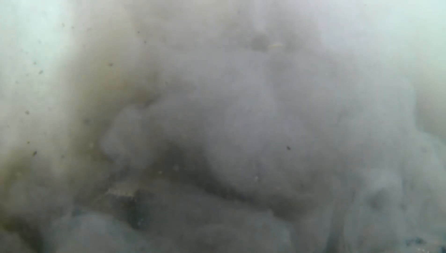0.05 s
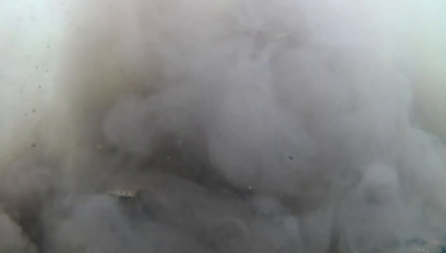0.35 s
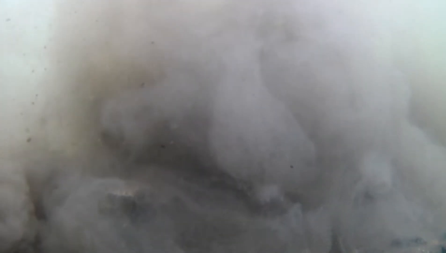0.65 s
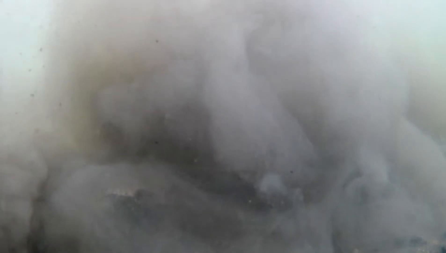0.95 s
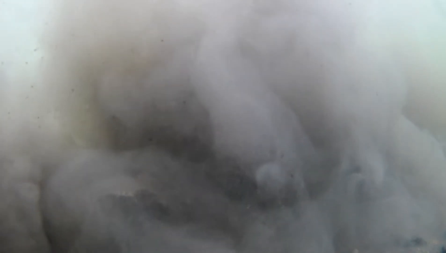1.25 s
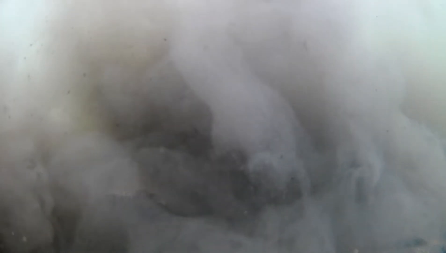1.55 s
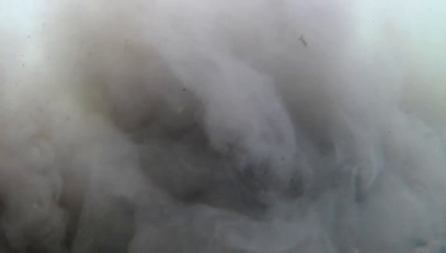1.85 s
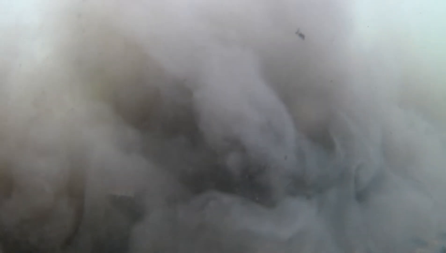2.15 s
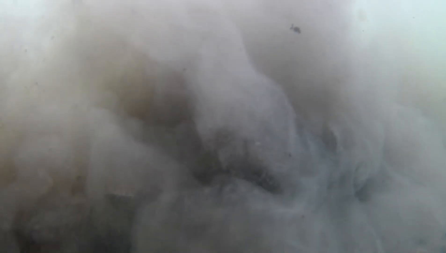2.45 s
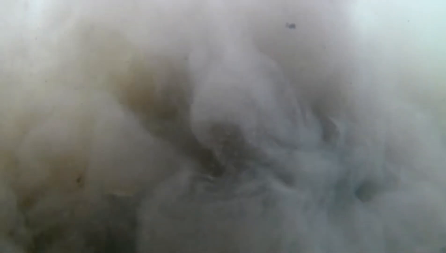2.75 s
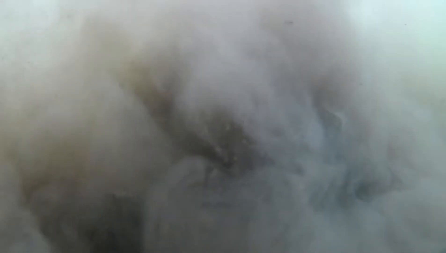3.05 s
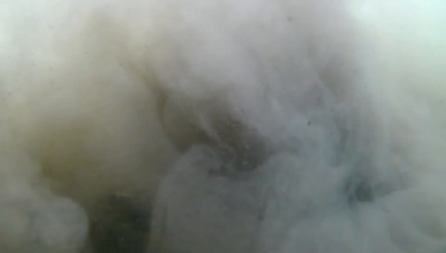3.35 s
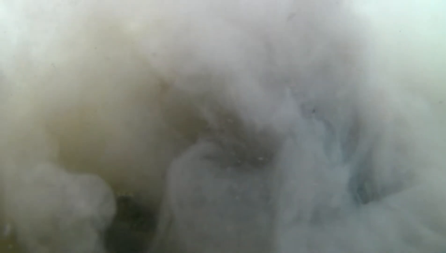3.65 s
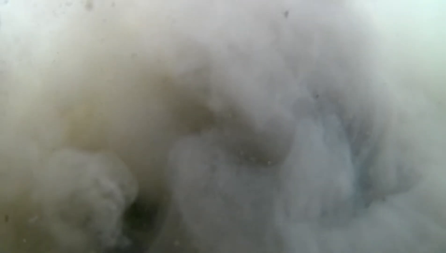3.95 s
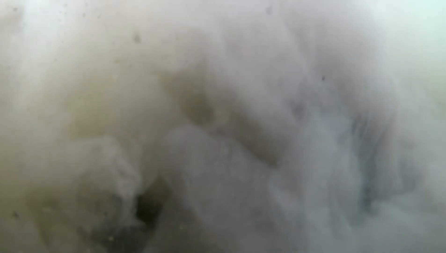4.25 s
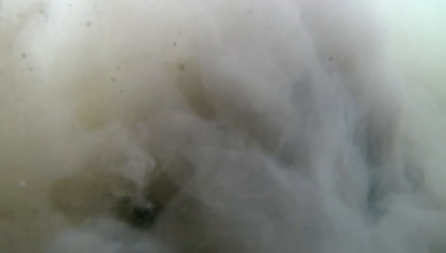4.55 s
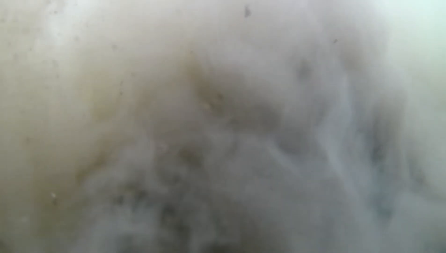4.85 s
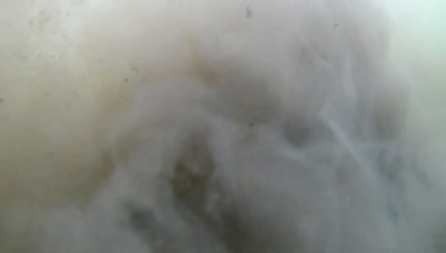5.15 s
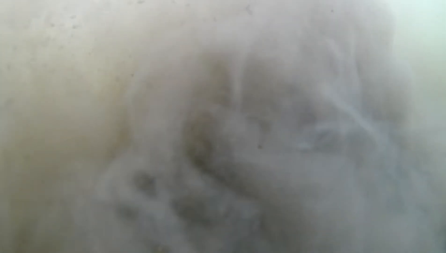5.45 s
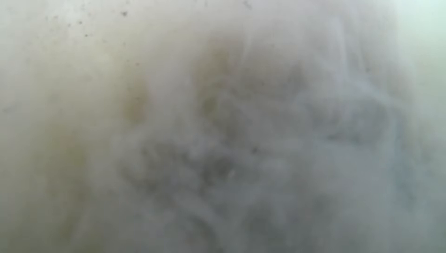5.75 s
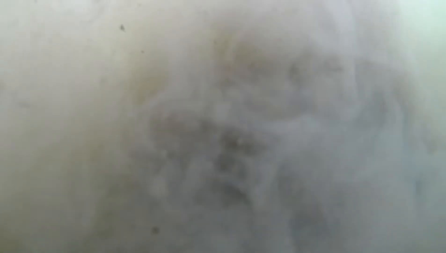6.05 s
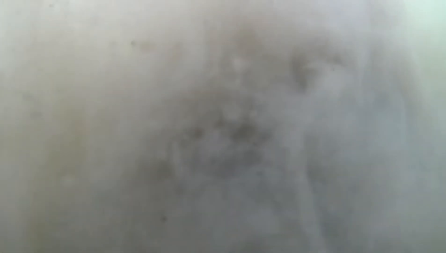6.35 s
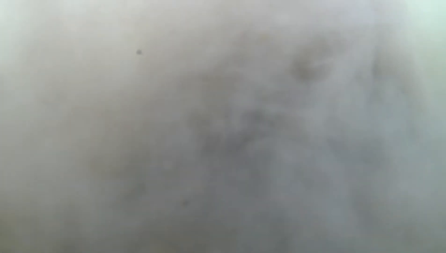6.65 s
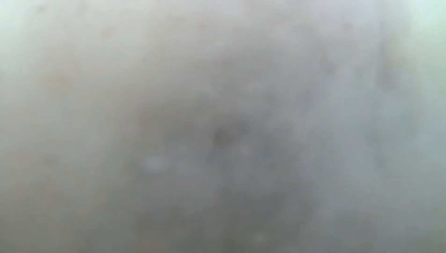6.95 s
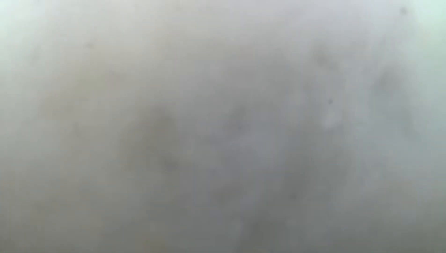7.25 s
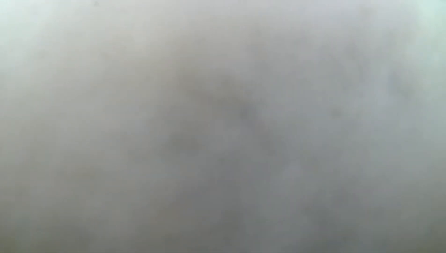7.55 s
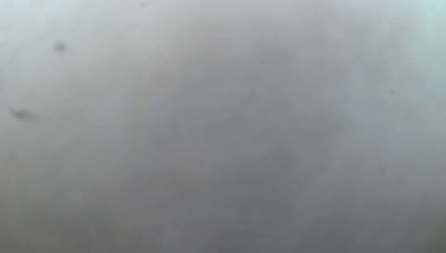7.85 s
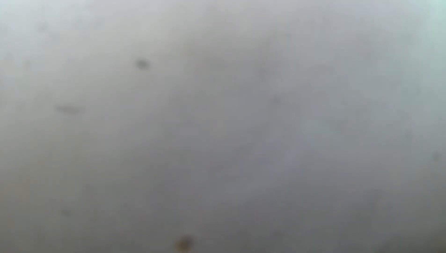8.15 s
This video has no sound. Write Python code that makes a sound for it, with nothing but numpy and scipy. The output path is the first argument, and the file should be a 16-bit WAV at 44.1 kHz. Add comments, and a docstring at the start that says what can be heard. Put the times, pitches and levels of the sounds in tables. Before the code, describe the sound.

A duck feeds on a muddy lake bed, heard muffled through an underwater microphone in a watertight case. From the start, its bill dabbles in quick, dull nibbles and harder hollow pecks, with gritty clicks over a low rumble of churned water; the hardest peck lands at about 0.3 seconds. After 2 seconds it slows to single pecks, stopping by 3 seconds.

Sand then hisses softly and bubbles swell into a dense gurgle, strongest from 3.2 to 4 seconds before easing. A second, lighter surge of sand and bubbles comes at around 5.5 seconds, with the loudest single plop at 6 seconds. The bubbling thins to scattered, quieter plops, the last near 7.6 seconds.

Knocks and bubbles make the case ring briefly. A faint low hum and hiss continue to the end at about 8 seconds, while very soft high ticks come and go.

```python
"""Ducks feed on a muddy lake bed, heard from a camera in a watertight case under the surface.
First a bill dabbles in the silt: quick dull nibbles, harder pecks and clicks on grit over a rumble of
churned water. It slows to single pecks and stops. Then the bed is stirred twice: sand hisses up,
bubbles gurgle after it and thin out to single plops. Knocks, bubbles and grains ring the case;
a faint hum and hiss lie under it all, and soft high ticks come and go."""
import sys
import numpy as np
from scipy import signal
from scipy.fft import rfft, irfft, next_fast_len
from scipy.io import wavfile

SR = 44100
rng = np.random.default_rng(int(sys.argv[2]) if len(sys.argv) > 2 else 0)


def dump_mix(stems):
    """Bounce the given channels to the path in sys.argv[1] as a 16-bit WAV at rate SR."""
    frames = np.atleast_2d(stems).T  # one column per channel
    limited = np.clip(frames, -1, 1)  # hard clip at full scale
    pcm = np.round(limited * 32767).astype(np.int16)
    wavfile.write(sys.argv[1], SR, pcm)


N = 361604
T = np.arange(N) / SR

# Hard pecks of the bill. Each row: time in seconds, level in dB, pitch in Hz.
HARD_PECKS = [(.188, -26, 647), (0.2611, -25.5, 566), (.2955, -27, 655), (0.2986, -13, 633),
              (.343, -30, 545), (.385, -30.5, 600), (0.4261, -28, 532), (0.478, -25, 693),
              (0.5209, -26, 500), (.567, -34, 600), (0.6244, -26, 538), (0.6554, -26, 547),
              (0.7192, -24, 572), (0.7333, -24, 644), (.738, -35, 570), (.769, -30.5, 600),
              (0.7927, -24, 528), (.7995, -29, 564), (.848, -31, 555), (.885, -29.5, 620),
              (0.939, -29.5, 530), (1.116, -16.5, 466), (1.1552, -23, 550), (1.192, -30.5, 534),
              (1.231, -24, 676), (1.254, -28.5, 614), (1.2881, -23.5, 515), (1.308, -26, 590),
              (1.377, -26.5, 432), (1.3965, -28, 527), (1.436, -28, 614), (1.483, -42, 600),
              (1.578, -28, 580), (1.6742, -30.5, 704), (1.729, -32.5, 586), (1.776, -31, 565),
              (1.8616, -18, 635), (1.894, -37.5, 715), (1.959, -30.5, 644), (2.001, -21, 580),
              (2.054, -30.5, 710), (2.109, -26.5, 534), (2.171, -40.5, 696), (2.195, -43, 530),
              (2.226, -47, 660), (2.279, -46, 749), (2.305, -39, 470), (2.321, -29.5, 558),
              (2.349, -43, 430), (2.3645, -27.5, 438), (2.506, -37, 593), (2.5687, -28, 570),
              (2.629, -39.5, 600), (2.705, -36, 624), (2.86, -34.5, 633), (2.954, -45.5, 705)]
# Mud churned by the bill. Each row: time in seconds, patter level in dB, rumble level in dB.
MUD_CHURN = [(0, -54.5, -55), (.2, -42, -53), (.7, -43.5, -48.5), (1.05, -47, -52), (1.35, -42.5, -50),
             (1.8, -47.5, -57), (2.25, -55.5, -63), (2.5, -54, -63), (3.05, -66.5, -85)]
# Stirrings of the bed. Each row: time of full strength in seconds, hold in seconds, build-up in dB/s,
# settling in dB/s, levels of coarse sand, fine sand and bubbles in dB.
BED_STIRS = [(3.306, 0.22, 23, 21.5, -59.5, -66, -41), (5.44, 0.17, 49.5, 36.5, -61.5, -64.5, -46.5)]
# Low and high modes of the case. Each row: frequency in Hz, gain in dB, T60 in seconds.
CASE_LOW_MODES = [(350, -19.5, 0.45), (446, -4, 0.54), (569.6, 8.5, 0.21), (564, -7.5, 0.34),
                  (721.5, 0.5, 0.23), (779, -8.5, 0.052), (806, -10, 0.24)]
CASE_HIGH_MODES = [(1322, 19.5, 0.12), (1994, 19, 0.065), (2630, -1.5, 0.022), (3480, -2.5, 0.039),
                   (4130, -9.5, 0.0097), (6200, -6.5, 0.0046)]
# Spectrum of scraped grit. Each row: frequency in Hz, gain in dB.
GRIT_SPECTRUM = [(500, -7.5), (1000, 17), (1250, 5), (1650, 13.5), (2150, -5.5), (2500, 4), (2850, -21),
                 (3300, -10.5), (4300, -14), (5500, -32.5), (6500, -13.5), (8000, -39)]


def undb(db):
    """Decibels to gain."""
    return 10 ** (np.asarray(db) / 20)


def unit(x):
    """Scale to rms 1."""
    return x / np.sqrt(np.mean(x ** 2) + 1e-20)


def curve(table, column=1):
    """Gain over time from a dB column; fades outside the table's span."""
    rows = np.asarray(table)
    outside_s = np.maximum(rows[0, 0] - T, 0) + np.maximum(T - rows[-1, 0], 0)
    return undb(np.interp(T, rows[:, 0], rows[:, column])) * np.exp(-outside_s / 0.071)


def surge(s, hold_s, build_db_per_s, settle_db_per_s):
    """Gain that builds to 1 at time s, holds and settles."""
    return undb(-build_db_per_s * np.maximum(s - T, 0) - settle_db_per_s * np.maximum(T - s - hold_s, 0))


def walk(knots_per_s):
    """Random drift with a spread near 1."""
    knots = rng.standard_normal(1024)
    return np.interp(T * knots_per_s, np.arange(len(knots)), knots) * np.sqrt(3 / 2)


def colour(x, spectrum):
    """Filter by (Hz, dB) points, to rms 1."""
    hz, db = np.transpose(spectrum)
    size = next_fast_len(N, True)
    bins_hz = np.maximum(np.arange(size // 2 + 1) * SR / size, 1)
    gain = undb(np.interp(np.log(bins_hz), np.log(hz), db))
    return unit(irfft(rfft(x, size) * gain, size)[:N])


def muffle(x, hz):
    """Steep low-pass."""
    return signal.sosfilt(signal.butter(8, hz, fs=SR, output="sos"), x)


def zero_phase(x, order, hz, kind="low"):
    """Butterworth filter, run forward and back."""
    return signal.sosfiltfilt(signal.butter(order, hz, kind, fs=SR, output="sos"), x)


def add(track, s, sound):
    """Mix a sound into a track at time s."""
    i = int(np.clip(s * SR, 0, N))
    track[i:i + len(sound)] += sound[:N - i]


def swell(rise_s, shape):
    """Envelope peaking at rise_s; a higher shape starts softer and dies sooner."""
    t = T[:int(8 * rise_s * SR)]
    return (t / rise_s * np.exp(1 - t / rise_s)) ** shape


def ping(hz, rise_s, shape, glide_per_s=0):
    """Resonance that swells and dies; the glide is a share of its pitch."""
    envelope = swell(rise_s, shape)
    t = T[:len(envelope)]
    return envelope * np.sin(2 * np.pi * hz * t * (1 + glide_per_s * t / 2))


def swarm(hz, spread, rise_s, scatter_db, count, shape=1):
    """Pings of random time, pitch, length and size over the whole scene, rms 1."""
    out = np.zeros(N)
    starts_s = rng.uniform(0, N / SR, count)
    for s, (pitch, length, size) in zip(starts_s, np.clip(rng.standard_normal((count, 3)), -2, 2)):
        tone = ping(hz * np.exp(spread * pitch), rise_s * np.exp(0.45 * length), shape)
        add(out, s, undb(scatter_db * size) * tone)
    return unit(out)


def case_ring(push, modes, lag_s=0):
    """The case rings on in its damped modes after a push."""
    t = T[:SR // 2]
    response = sum(undb(db - 60 * t / t60_s) * np.cos(2 * np.pi * hz * t) / t60_s
                   for hz, db, t60_s in modes)
    out = np.zeros(N)
    add(out, lag_s, signal.fftconvolve(push, response * 2 * np.log(1000) / SR)[:N])
    return out


def camera(hiss_db=-64, hum_hz=33.5):
    """Steady hiss and a low wavering hum."""
    # Noise floor. Each row: frequency in Hz, gain in dB.
    hiss_spectrum = [(12, -14.5), (35, 9), (80, -3), (160, -0.5), (300, -7.5), (500, -8), (730, -2),
                     (950, -16), (1400, -18), (2500, -24), (4000, -26), (7600, -31), (9000, -49)]
    # Odd harmonics of the hum. Each row: multiple of hum_hz, rms level in dB.
    harmonics = [(1, -68), (3, -71.5), (5, -81.5), (7, -88.5), (9, -87.5)]
    phase = 2 * np.pi * np.cumsum(hum_hz * (1 + .008 * walk(7.9))) / SR
    hum = sum(undb(db + 1.3 * walk(15)) * np.sqrt(2) * np.sin(k * phase) for k, db in harmonics)
    return undb(hiss_db) * colour(rng.standard_normal(N), hiss_spectrum) + hum


def ticking(tick_db=-2, tick_hz=4920, count=150, chirp_gap_s=0.018):
    """Faint high ticks come and go, at times bunched into a chirp of three."""
    # Loudness of the ticks. Each row: time in seconds, level in dB.
    tick_levels = [(0, -72), (2.2, -73), (2.35, -90), (4.95, -90), (5.08, -70), (6.2, -72), (8.2, -73)]
    # Chirps. Each row: start in seconds, level in dB, pitch in Hz.
    chirp_events = [(.205, -73, 4840), (.625, -76.5, 4900), (5.83, -74.5, 4720), (6.78, -75, 4830)]
    ticks, chirps = np.zeros((2, N))
    for k, (late, pitch, size) in enumerate(rng.standard_normal((count, 3))):
        tick = ping(tick_hz * (1 + .025 * pitch), rise_s=.0038, shape=5)
        add(ticks, (k + 1.1 * late) * N / SR / count, undb(tick_db + 1.3 * size) * tick)
    for s, db, hz in chirp_events:
        for k, pitch in enumerate(rng.standard_normal(3)):
            tick = ping(hz * (1 + .015 * pitch), rise_s=.006, shape=4, glide_per_s=1)
            add(chirps, s + k * chirp_gap_s, undb(db) * tick)
    return curve(tick_levels) * ticks + chirps


def bubble_flow(lag_s=0.031, linger_s=0.038, seep_db=-73.5):
    """Gain of the gurgle: it lags each stirring; after the first the bed goes on seeping."""
    flow = sum(undb(db) * surge(s + lag_s, hold_s + linger_s, build_db_per_s=53.5, settle_db_per_s=33.5)
               for s, hold_s, *_, db in BED_STIRS)
    return flow + undb(seep_db) * (T > BED_STIRS[0][0])


def eddies(rumble_db=1, flutter_db=0.5, wake_db=-24):
    """Churned water presses on the case in a fluttering rumble; rising bubbles leave a softer wake."""
    # Spectra of rumble and wake. Each row: frequency in Hz, gain in dB.
    rumble_spectrum = [(15, -23), (30, 3), (70, -4), (125, -3.5), (200, -4), (320, -2.5), (600, -8),
                       (1200, -90.5)]
    wake_spectrum = [(70, -4.5), (125, 13.5), (175, -5.5), (260, -5), (500, -54)]
    pressure = undb(rumble_db + flutter_db * walk(22)) * curve(MUD_CHURN, column=2)
    rumble = colour(rng.standard_normal(N), rumble_spectrum)
    wake = colour(rng.standard_normal(N), wake_spectrum)
    return pressure * rumble + undb(wake_db) * bubble_flow() * wake


def sand(coarse_db=-5.5, fine_db=-5, hiss_db=-3, fizz_db=-1.5, drift_db=-84.5, fine_lead_s=.04):
    """Grains crackle on the case and ring its high modes amid a fizz; fine, bright sand arrives first."""
    # Spectrum of the crackle. Each row: frequency in Hz, gain in dB.
    spectrum = [(600, -12), (1000, 10), (1200, -10.5), (1500, -7.5), (1800, -1.5), (2250, -18.5),
                (2520, -4.5), (2950, -17), (3450, -8.5), (4100, -12), (4600, -14), (6200, -26), (8000, -50)]
    # Brief crackling hisses: puffs of sand, and the case's high ring after the loudest plop.
    # Each row: start in seconds, level in dB, rise in seconds.
    hisses = [(.18, -63, 0.017), (1.611, -62, 0.012), (1.696, -55, 0.0055), (2.425, -63, 0.0036),
              (2.467, -62.5, .004), (2.765, -70, 0.0097), (3.328, -53.5, 0.013), (4.629, -63, 0.0058),
              (4.679, -70, 0.0049), (4.968, -63, 0.0034), (5.255, -69, 0.0061), (6.008, -65, .012)]
    coarse_flow, fine_flow = np.zeros((2, N))
    for s, hold_s, build, settle, stir_coarse_db, stir_fine_db, _ in BED_STIRS:
        coarse_flow += undb(stir_coarse_db + coarse_db) * surge(s, hold_s, build, settle)
        fine_flow += undb(stir_fine_db + fine_db) * surge(s - fine_lead_s, hold_s, build, settle)
    coarse_flow += undb(drift_db + coarse_db) * (T < BED_STIRS[-1][0])  # drifts until the last stir
    for s, db, rise_s in hisses:
        add(coarse_flow, s, undb(db + hiss_db) * swell(rise_s, 0.93))
    sizes = undb(2.5 * np.minimum(rng.exponential(size=N), 4))
    impacts = rng.standard_normal(N) * (rng.random(N) < .025) * sizes
    grains = colour(impacts, spectrum)
    fizz = swarm(hz=2400, spread=.42, rise_s=.0019, scatter_db=2.8, count=4000, shape=2)
    crackle = unit(grains + case_ring(grains, CASE_HIGH_MODES)) + undb(fizz_db) * colour(fizz, spectrum)
    coarse = zero_phase(crackle, order=2, hz=2820)
    fine = zero_phase(crackle, order=2, hz=[2400, 4850], kind="band")
    flutter = undb(1.8 * walk(70))
    return flutter * (coarse_flow * coarse + fine_flow * fine)


def trickle():
    """Stray tiny bubbles pop against the case."""
    # Loudness of the pops. Each row: time in seconds, level in dB.
    pop_levels = [(0, -86), (2.2, -84), (2.6, -81), (4.2, -82), (4.4, -88), (5, -86), (6.2, -87),
                  (7.4, -90), (8.2, -96)]
    pops = swarm(hz=1900, spread=.3, rise_s=.0007, scatter_db=3, count=320)
    return curve(pop_levels) * unit(pops + case_ring(pops, CASE_HIGH_MODES))


def splinters(parent_db, parent_hz, count=6, span_s=.05, spread_hz=115, fade_db_per_s=110):
    """A bubble sheds lesser ones near its own pitch, weaker the later they come."""
    usual_parent_db, growth = -42, .76
    cluster_db = -54.5 + growth * (parent_db - usual_parent_db)
    out = np.zeros(N)
    for late, pitch, size in rng.uniform(-1, 1, (count, 3)):
        delay_s = span_s * (1 + late) / 2
        tone = ping(parent_hz + spread_hz * pitch, rise_s=.003, shape=2.6)
        add(out, delay_s, undb(cluster_db - fade_db_per_s * delay_s + 2 * size) * tone)
    return out[:SR // 4]


def bubbles(bubble_db=1, short_db=-6, long_db=-4, froth_db=-24, bump_db=-18, high_ring_db=-19):
    """Air let go under water: each bubble rings at the pitch of its size, rising as it floats up."""
    # Distinct bubbles. Each row: time in seconds, level in dB, nominal pitch in Hz,
    # nominal rise in seconds, coupling to the case in dB.
    plops = [(0.0381, -55, 1110, 0.0063, -2), (0.3548, -59, 2054, 0.0046, -3),
             (1.5541, -37.5, 946, 0.0029, -5), (1.607, -55, 1480, 0.0022, -8),
             (1.61, -40.5, 789, 0.011, 0.5), (1.632, -60, 2480, 0.0019, -9), (1.639, -57, 1660, .003, -5),
             (1.797, -57.5, 1550, 0.0034, 1), (2.4411, -40, 745, 0.0077, 1.5),
             (2.53, -65, 1900, 0.0018, -2), (2.66, -62.5, 2108, 0.0033, 2), (2.7729, -45, 783, 0.0034, -17),
             (3.02, -42.5, 754, 0.0036, 3.5), (3.139, -40.5, 706, 0.0096, -7.5),
             (3.164, -57.5, 1324, 0.0072, 2), (3.164, -37.5, 754, 0.0032, -8.5),
             (3.1987, -31, 757, 0.0041, 2.5), (3.2268, -26.5, 745, 0.003, -21),
             (3.2788, -18, 691.4, 0.0099, -9), (3.303, -37.5, 721, 0.0049, -10.5),
             (3.322, -30, 720, .014, -17.5), (3.3465, -24.5, 708, 0.0032, -11),
             (3.356, -30, 730, 0.0035, -9.5), (3.3965, -28, 710, 0.0065, -2),
             (3.4198, -30, 735, 0.0095, -3), (3.445, -34.5, 746, 0.0069, -10.5),
             (3.48, -25, 734, 0.0046, -13), (3.486, -63, 6100, 0.0011, -20),
             (3.5083, -26, 727, 0.0031, -14), (3.551, -22, 700, 0.003, -22.5),
             (3.5704, -25.5, 670, 0.0045, -1.5), (3.595, -31.5, 730, 0.0083, -8),
             (3.654, -35, 743, .007, -9.5), (3.7223, -20, 671, 0.0038, -7.5),
             (3.7325, -28, 730, 0.0047, -14), (3.762, -41, 680, .0035, -7.5),
             (3.842, -38.5, 759, 0.0063, -18), (3.8828, -36, 772, 0.0074, -1),
             (3.9187, -30.5, 833, 0.0021, -14), (3.9427, -29, 742, 0.0094, -18),
             (3.9971, -37.5, 760, 0.0065, -19), (4.049, -47.5, 1286, 0.007, -4),
             (4.0635, -37.5, 706, 0.0066, -8), (4.105, -51, 976, .005, -8), (4.121, -43, 669, 0.0088, -10),
             (4.1487, -34, 677, 0.0048, 3.5), (4.21, -50, 750, 0.0066, 9), (4.262, -57.5, 630, 0.0062, 7.5),
             (4.1759, -34, 773, 0.0058, -13), (4.226, -63, 1570, 0.0054, -7),
             (4.2532, -63, 1600, .0052, -1), (4.3257, -52, 1824, 0.0051, -13),
             (4.3618, -45.5, 715, 0.0049, 2.5), (4.451, -55.5, 690, 0.0058, 2.5),
             (4.5433, -44.5, 597, 0.0039, -6.5), (4.629, -66, 2030, .003, 5),
             (4.679, -63, 2040, 0.0031, -4), (4.7591, -62, 2010, 0.0024, -3),
             (4.883, -65.5, 1604, 0.0076, 5), (4.916, -65, 1620, .005, 0), (4.9476, -38, 834, 0.0029, -16),
             (4.958, -48, 838, 0.0073, -5), (4.984, -68, 1570, 0.0046, -1),
             (5.062, -53.5, 760, 0.0077, 2.5), (5.2045, -44, 716, 0.0021, -10),
             (5.246, -44.5, 732, 0.0067, -4), (5.334, -41.5, 710, 0.002, -8), (5.405, -38, 757, 0.0037, -4),
             (5.264, -60, 1940, 0.0034, 2.5), (5.2777, -37, 700, 0.0074, -11),
             (5.3558, -32.5, 748, 0.0065, -30), (5.3729, -34.5, 824, 0.0034, -11.5),
             (5.4787, -36, 727, 0.0076, -22), (5.6229, -22, 728, 0.0053, -5),
             (5.612, -40.5, 731, 0.0071, -8), (5.626, -41.5, 545.4, 0.0077, 2.5),
             (5.7395, -28, 711, 0.0079, -10), (5.78, -37.5, 687, 0.0098, 1.5),
             (5.819, -33.5, 750, 0.0034, 2), (5.82, -50, 580, 0.0044, 3.5),
             (5.8214, -55.5, 1915, 0.0033, -0.5), (5.9005, -60.5, 1300, 0.0081, 11),
             (5.907, -44, 590, 0.0014, 9.5), (5.9835, -14, 689, 0.0054, 3), (6.0005, -26.5, 702, 0.0019, 2),
             (6.006, -25.5, 623, 0.006, -4), (6.095, -67, 1290, 0.0052, -7),
             (6.1402, -37.5, 815, 0.0037, -1.5), (6.2452, -42, 724, 0.0039, 5),
             (6.262, -53.5, 590, 0.009, 8), (6.3711, -58.5, 1186, 0.0058, 6), (6.372, -35, 698, 0.003, 9),
             (6.4539, -44, 766, 0.0058, 11.5), (6.456, -68, 2550, 0.0021, -1),
             (6.7634, -41, 746, 0.0089, -11), (6.795, -51.5, 745, 0.0055, -12),
             (6.8186, -49.5, 705, 0.0094, -14), (6.862, -70, 1740, .007, -7), (6.923, -58, 748, 0.0069, -9),
             (7.008, -68, 765, .005, -13), (7.238, -68, 2410, 0.0032, -5), (7.2509, -44, 726, 0.0096, -6),
             (7.318, -48, 754, 0.009, -2), (7.343, -48.5, 697, 0.0035, -2), (7.395, -59, 735, .004, -8),
             (7.3251, -61.5, 3310, 0.0027, -36), (7.4478, -42.5, 720, 0.013, -27),
             (7.4505, -65, 1658, 0.0063, -11), (7.6318, -57, 1060, 0.003, -17),
             (7.634, -37.5, 710, 0.0044, 2)]
    large, small, push = np.zeros((3, N))
    for s, db, hz, rise_s, coupling_db in plops:
        bursts_on_case = coupling_db > 2.9  # starts abruptly, kicks the low modes harder
        stretch, shape, kick_db = (1, 1.5, -5) if bursts_on_case else (1.35, 2.6, -16)
        tone = undb(db + bubble_db) * ping(hz * .99, rise_s * stretch, shape, glide_per_s=0.92)
        start_s = s - (stretch - 1) * rise_s
        track = large if hz < 900 else small
        add(track, start_s - .0006, tone)
        add(track, s, splinters(db, hz) * (hz < 2300))
        add(push, start_s, undb(coupling_db) * tone)
        kick = undb(db + coupling_db + kick_db) * ping(hz=460, rise_s=.003, shape=1)
        add(push, s, kick)
        add(large, s, undb(bump_db) * kick)
    flow = bubble_flow()
    short_pings = swarm(hz=747.3, spread=0.083, rise_s=0.0035, scatter_db=1.5, count=700, shape=3.2)
    long_pings = swarm(hz=733.3, spread=.08, rise_s=0.0092, scatter_db=1, count=230, shape=0.54)
    gurgle = flow * (undb(short_db) * short_pings + undb(long_db) * long_pings)
    froth = undb(froth_db) * flow * swarm(hz=1402, spread=0.26, rise_s=0.0035, scatter_db=5, count=1500)
    low_ring = case_ring(push + undb(-1) * gurgle, CASE_LOW_MODES, lag_s=0.00778)
    high_ring = undb(high_ring_db) * case_ring(small + froth, CASE_HIGH_MODES)
    return muffle(large + gurgle + low_ring, hz=1000) + small + froth + high_ring


def snaps(crunch_db=-2, pivot_hz=3200):
    """The bill closes on hard grit: a short click, dull or bright, and a crunch."""
    # Snaps of the bill. Each row: start in seconds, level in dB, tilt about pivot_hz in dB/octave.
    snap_events = [(.195, -62, 1.5), (0.298, -62.5, -5), (0.52, -63, -6), (1.118, -69, -5),
                   (1.209, -64.5, 10), (1.235, -68, -6), (1.329, -62, 6), (1.652, -62, -3),
                   (1.865, -70, -5), (2, -51.5, -5), (2.011, -57, -4), (2.054, -53.5, -1.5),
                   (2.108, -62, -1), (2.449, -64, -8), (2.605, -67, 4), (2.774, -65, -4), (2.826, -68, 12),
                   (2.954, -65, 2), (3.23, -56.5, 0.5), (3.371, -65, 1), (3.662, -65, 7), (4.632, -63, -5),
                   (4.971, -63.5, -3)]
    # Modes of a click. Each row: frequency in Hz, gain in dB.
    click_modes = [(2380, -5), (3200, 0.5), (3830, -5), (6200, -12.5)]
    clicks, crunch = np.zeros((2, N))
    for s, db, tilt in snap_events:
        add(crunch, s, undb(db + crunch_db) * swell(rise_s=0.0027, shape=0.37))
        for hz, mode_db in click_modes:
            gain = undb(db + mode_db + tilt * np.log2(hz / pivot_hz))
            add(clicks, s, gain * ping(hz, rise_s=0.00068, shape=0.98))
    return clicks + crunch * colour(rng.standard_normal(N), GRIT_SPECTRUM)


def nibbles(rate_per_s=30, jitter=0.5, until_s=2.3, over_churn_db=13.5, hz=564, thud_db=-16.5):
    """Light pecks between the hard ones, as strong as the churn; rows (s, dB, Hz, thud dB, rise s)."""
    churn_s, patter_db, _ = np.transpose(MUD_CHURN)
    hard_s = np.transpose(HARD_PECKS)[0]
    rows, s = [], 0
    for gap, size, pitch in np.clip(rng.standard_normal((128, 3)), -2, 2):
        s += np.exp(jitter * gap) / rate_per_s
        if s < until_s and np.min(np.abs(hard_s - s)) > .5 / rate_per_s:
            db = np.interp(s, churn_s, patter_db) + over_churn_db + 0.5 * size
            rows.append((s, db, hz * np.exp(0.16 * pitch), db + thud_db, .003))
    return rows


def grit(scrape, patter, patter_db=-30, scatter_db=3.5, changes_per_s=60):
    """Grit rasps with each peck and clod, varying in amount and brightness."""
    envelope = scrape + undb(patter_db + scatter_db * walk(changes_per_s)) * np.abs(patter)
    rasp = colour(rng.standard_normal(N), GRIT_SPECTRUM)
    dull = zero_phase(rasp, order=4, hz=2100)
    treble = undb(scatter_db * walk(changes_per_s)) * (rasp - dull)
    return envelope * (dull + treble)


def dabbling(knock_db=-1, rebound_db=-9, ring_db=-15, patter_db=-2, wet_db=-7.5, scatter_db=2):
    """Each peck knocks, rebounds, thuds into the bed and scrapes; clods patter, bubbles churn between."""
    rebound_hz, thud_hz = 703, 130
    hard_thud_db, hard_rise_s = -54.5, 0.0024
    usual_peck_db, usual_grit_db, grit_growth = -24.5, -62, 0.55
    knocks, thuds, scrape = np.zeros((3, N))
    pecks = [(s, db, hz, hard_thud_db, hard_rise_s) for s, db, hz in HARD_PECKS] + nibbles()
    variations = rng.uniform(-1.04, 1, (256, 4))
    for (s, db, hz, thud_db, rise_s), (late, pitch, weight, gritty) in zip(pecks, variations):
        knock = ping(hz, rise_s, shape=2.85)
        rebound = ping(rebound_hz * (1 + .08 * pitch), rise_s=0.0025, shape=1.9)
        thud = ping(thud_hz * (1 + .14 * pitch), rise_s=0.012, shape=2.8)
        grit_db = usual_grit_db + grit_growth * (db - usual_peck_db)
        add(knocks, s - .0013, undb(db + knock_db) * knock)
        add(knocks, s + 0.00351 + 0.002 * late, undb(db + rebound_db) * rebound)
        add(thuds, s - .002, undb(thud_db + scatter_db * weight) * thud)
        add(scrape, s - .004, undb(grit_db + scatter_db * gritty) * swell(rise_s=0.0034, shape=1.5))
    churn = curve(MUD_CHURN)
    clods = swarm(hz=524, spread=0.201, rise_s=0.0034, scatter_db=3, count=1100, shape=1.8)
    mud_bubbles = swarm(hz=699, spread=0.142, rise_s=0.0065, scatter_db=5.5, count=1100, shape=2.4)
    patter = undb(patter_db) * churn * clods
    wet = undb(wet_db) * churn * mud_bubbles
    ring = undb(ring_db) * case_ring(knocks, CASE_LOW_MODES, lag_s=0.001)
    return muffle(knocks + patter + wet + ring, hz=960) + thuds + grit(scrape, patter)


def scene():
    """Everything reaches one microphone through the case."""
    return (dabbling() + snaps() + eddies() + bubbles() + sand() + trickle() + ticking() + camera())[None]


def record(dry):
    """The recorder cuts the treble above 8800 Hz."""
    return signal.sosfilt(signal.ellip(8, .2, 60, 8800, fs=SR, output="sos"), dry)


dry = scene()
out = record(dry)
dump_mix(out)
```